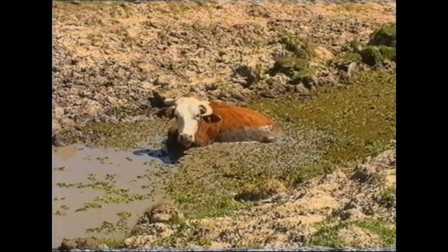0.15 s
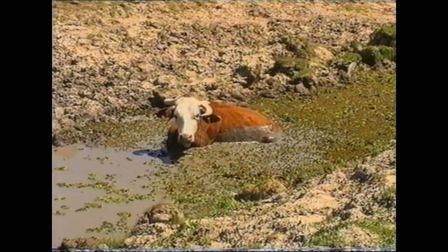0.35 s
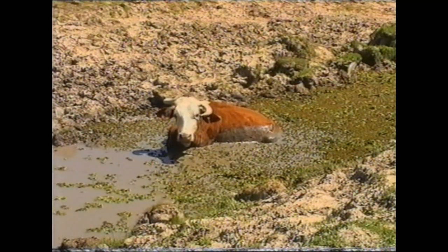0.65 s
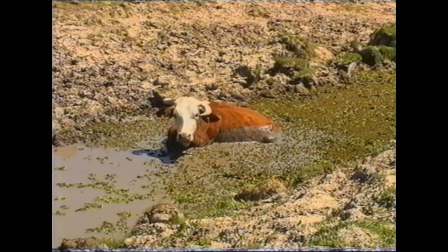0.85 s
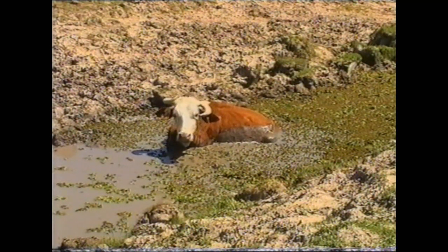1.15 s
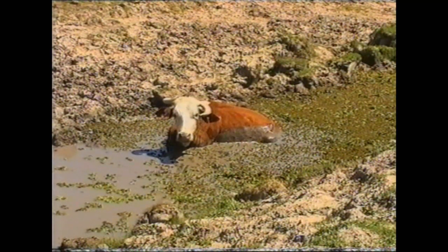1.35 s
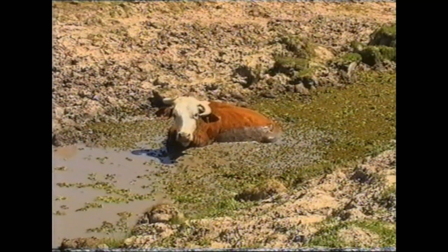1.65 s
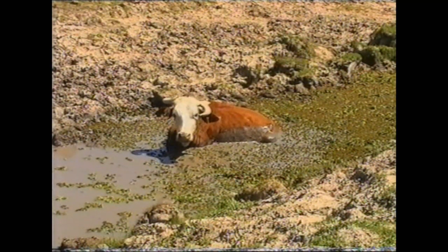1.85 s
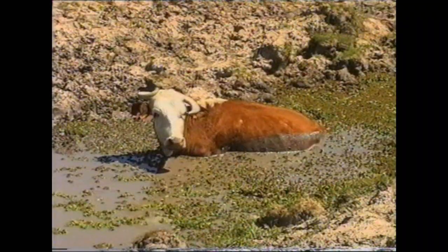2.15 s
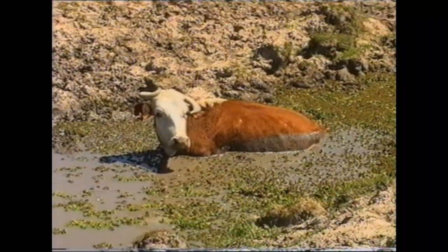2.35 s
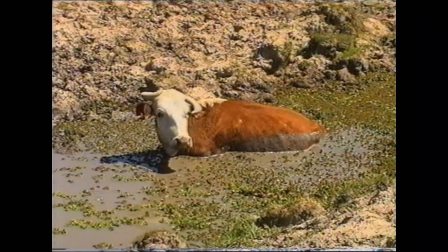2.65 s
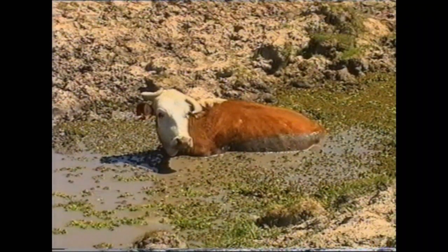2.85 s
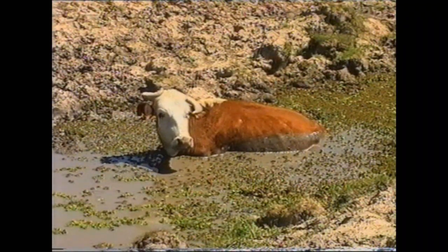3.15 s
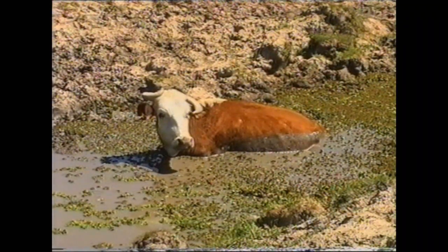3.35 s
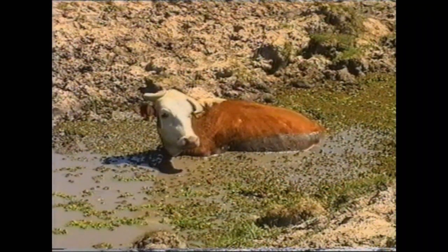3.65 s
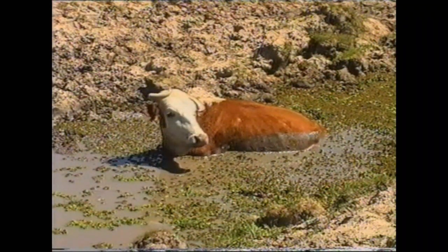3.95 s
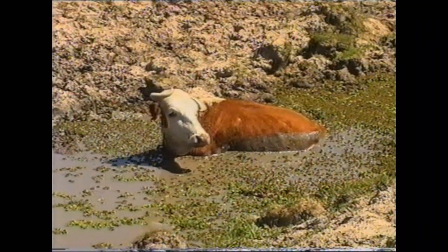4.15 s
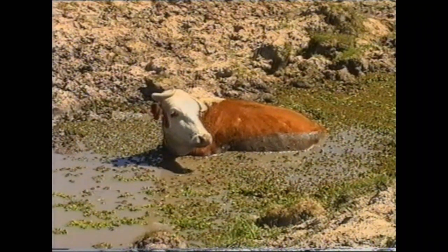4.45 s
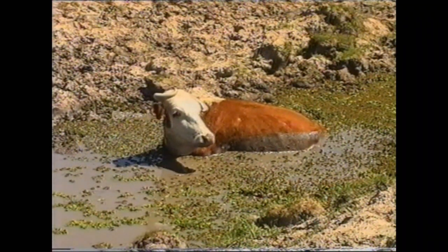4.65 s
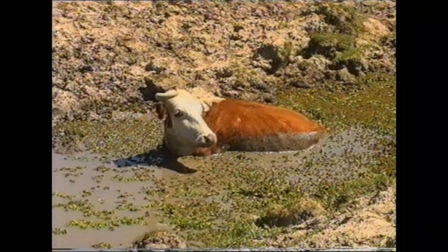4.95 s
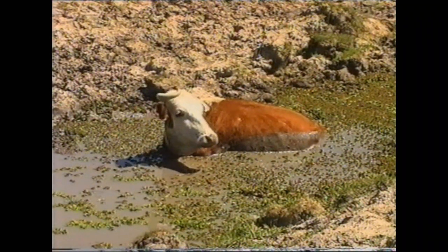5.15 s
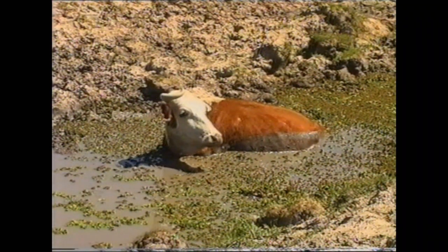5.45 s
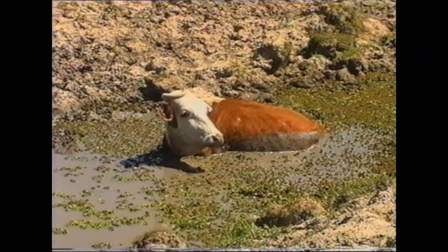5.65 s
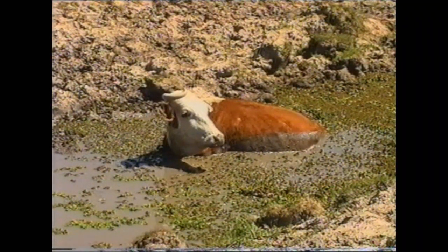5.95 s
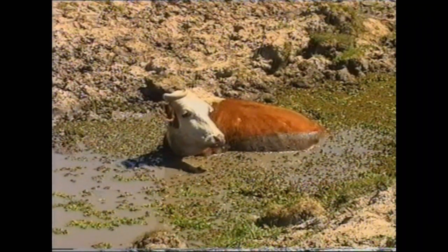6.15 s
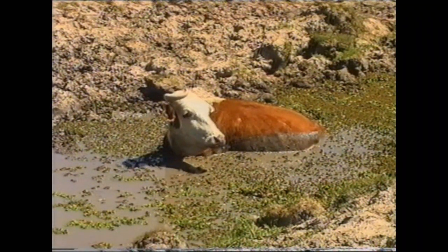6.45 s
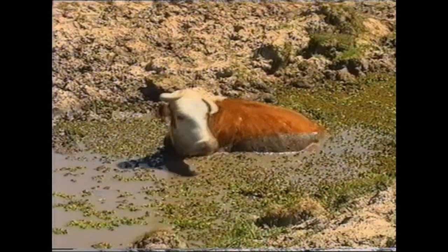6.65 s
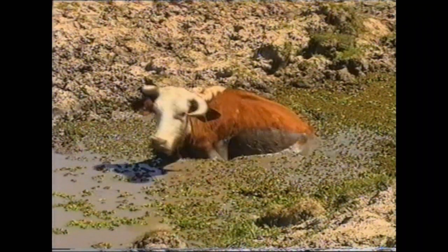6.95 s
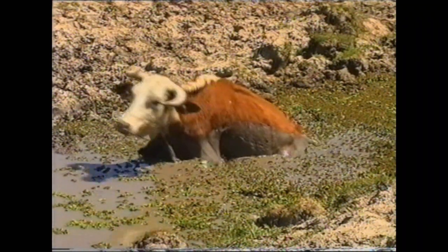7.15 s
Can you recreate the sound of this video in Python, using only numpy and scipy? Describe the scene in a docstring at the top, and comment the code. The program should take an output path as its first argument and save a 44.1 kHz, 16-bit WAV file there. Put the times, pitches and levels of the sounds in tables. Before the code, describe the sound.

For the first second, a few nearby birds pipe short, falling notes in a marsh, with thin warbles, downward whistles and a far flock behind them and a brief puff of wind on the microphone. At 1 second the sound cuts abruptly to a distant, dense chorus of small animals. Their high rasps and peeps merge into a rushing hiss that swells and lulls, grows slightly brighter, and lasts until the end at about 7.3 seconds. A sharp, close knock, like a small hollow shell being struck, sounds slightly to the right at 1.5 seconds. Much lighter knocks follow until 2.5 seconds, then near 4.2, 5.8 and 6.3, with a firmer one at 7.2. Low wind buffets hit the microphone around 3 seconds, most strongly between 4.7 and 5.4, and faintly near 7, over a soft stir of air.

```python
"""A marsh in a breeze, in two scenes. For the first second a few birds pipe falling notes close by,
harmonics shaped by the throat, while others whistle and warble behind them over a far flock.
Then a hard cut: a far, dense chorus of small callers, whose rasps and peeps merge into a rushing hiss.
A few close knocks ring a small hollow shell over it, the first one the hardest.
Wind buffets the two microphone ports in both scenes, most strongly just after five seconds."""
import sys
import numpy as np
from scipy import signal
from scipy.fft import rfft, irfft
from scipy.io import wavfile
from scipy.ndimage import uniform_filter1d

SR = 44100
rng = np.random.default_rng(int(sys.argv[2]) if len(sys.argv) > 2 else 0)


def master_out(mix):
    """Clip the mix to full scale and print it as 16-bit PCM to the path in sys.argv[1]."""
    frames = np.transpose(np.atleast_2d(mix))
    ceiling = np.clip(frames, -1, 1)
    pcm = np.round(ceiling * 32767).astype(np.int16)
    wavfile.write(sys.argv[1], SR, pcm)


N = 322371
T = np.arange(N) / SR
FADE_S, CUT_S = 1.001, 1.0056  # the birds have faded; the chorus cuts in

# Level ride of the higher callers: time_s, level_db
HIGH_RIDE = [(1.01, -27), (1.2, -27.5), (1.26, -30), (1.4, -26), (1.52, -29), (1.62, -26), (1.7, -28.5),
             (1.8, -26), (2.03, -30), (2.12, -27.5), (2.29, -26.5), (2.38, -30), (2.56, -27.5),
             (2.83, -29.5), (2.92, -24), (3.06, -31.5), (3.21, -25), (3.38, -29.5), (3.46, -25.5),
             (3.75, -26), (4.06, -23.5), (4.45, -28), (4.55, -22.5), (4.7, -26.5), (4.76, -22.5),
             (4.98, -26), (5.06, -24.5), (5.39, -25), (5.46, -21.5), (5.54, -27.5), (5.66, -29),
             (5.77, -23.5), (5.92, -28), (6.06, -24), (6.17, -28), (6.26, -23), (6.9, -28.5), (6.98, -25),
             (7.31, -27.5)]
# Slow rides of the other bands: time_s, lower_db, deepest_db, treble_db
BAND_RIDES = [(1.01, -34.5, -52, -48.5), (1.4, -30.5, -48.5, -48), (1.8, -30, -45, -47.5),
              (2.4, -31.5, -45.5, -47), (2.9, -31.5, -44, -46.5), (3.5, -31.5, -44, -44.5),
              (4.1, -31.5, -42.5, -42.5), (4.7, -33, -42.5, -42), (5.3, -32.5, -42.5, -41.5),
              (5.7, -34.5, -44.5, -42), (6.1, -34, -44, -43), (6.4, -31.5, -43, -43.5),
              (7.0, -32, -43.5, -42.5), (7.31, -33.5, -45.5, -45)]
# Nearer high callers: pitch_hz, spread_hz, offset_db, peeps_per_s
NEAR_PEEPERS = [(4330, 220, -3., 150), (5250, 350, -12., 40), (5600, 350, -16., 9)]
def chorus():
    """Countless small callers swell and lull in a wash of rasps, with peeps that stand out."""
    high_db = np.interp(T, *np.transpose(HIGH_RIDE))
    quick_db = high_db - uniform_filter1d(high_db, SR // 2)
    times, *rides = np.transpose(BAND_RIDES)
    low_db, deep_db, treble_db = (np.interp(T, times, ride) for ride in rides)
    low_db += .37 * quick_db  # the lower callers partly share the quick lulls
    out = rasp_wash(deep_db + 14.5 + .42 * quick_db, low_db + 6, high_db, treble_db + 19 + quick_db)
    out += amp(low_db - 3.5 + 2 * drift(N, 4000)) * peeps(2722, spread_hz=120, per_s=130, width_hz=240)
    for hz, spread_hz, db, per_s in NEAR_PEEPERS:
        out += amp(high_db + db + 2 * drift(N, 3000)) * peeps(hz, spread_hz, per_s, width_hz=300)
    return out * amp([[-.75], [.75]]) * (T >= CUT_S)


# Tone of the wash: freq_hz, gain_db
WASH_EQ = [(410, -78), (700, -40), (968, -27), (1430, -10.5), (2190, -8.5), (2560, -5), (3190, -7.5),
           (4350, -2), (6100, -14.5), (6850, -13), (7600, -21), (10900, -28), (12400, -36.5), (14300, -58),
           (15500, -79)]
# Its stereo width, side against mid: freq_hz, side_db
WASH_WIDTH = [(60, 5), (110, 4), (200, 2), (380, 31), (700, 9), (1290, -14.5), (2380, -16.5), (4400, -15.5),
              (8120, -8), (15000, -12.5)]
def rasp_wash(deep_db, low_db, high_db, treble_db):
    """Overlapping rasps merge into a hiss: four crossfaded bands, mottled by drifting patches."""
    hz, t, low_rasps = rasps(per_s=300, depth=.25)
    high_rasps = rasps(per_s=490, depth=.56)[2]
    hz = hz[:, None] + 1
    high_share = np.clip(np.log2(hz / 2900) / .53, 0, 1)
    deep_share = np.clip(np.log2(2100 / hz) / .3, 0, 1)
    treble_share = np.clip(np.log2(hz / 5800) / .5, 0, 1)
    under_db = (1 - deep_share) * np.interp(t, T, low_db) + deep_share * np.interp(t, T, deep_db)
    over_db = (1 - treble_share) * np.interp(t, T, high_db) + treble_share * np.interp(t, T, treble_db)
    spectra = np.sqrt(1 - high_share) * low_rasps * amp(under_db)
    spectra += np.sqrt(high_share) * high_rasps * amp(over_db)
    patches = uniform_filter1d(rng.standard_normal(spectra.shape[1:]), 3, axis=0)
    spectra *= amp(1.5 * evened(uniform_filter1d(patches, 10, axis=1)))
    mid, side = coloured(signal.istft(spectra, SR, nperseg=256)[1][:, :N], WASH_EQ)
    return amp(12) * stereo(mid, coloured(side, WASH_WIDTH))


def rasps(per_s, depth):
    """Short-time spectra of two noises that jump up at each call and fall back within milliseconds."""
    call_power = clicks(per_s, spread_db=3) ** 2
    power = signal.lfilter([1], [1, -np.exp(-1 / (.0073 * SR))], call_power)
    noise = rng.standard_normal((2, N)) * np.sqrt(1 + depth * power / power.mean())
    return signal.stft(noise, SR, nperseg=256)


def peeps(hz, spread_hz, per_s, width_hz):
    """Three callers, each a resonance of wandering pitch rung by its own random clicks."""
    out, pole = np.zeros(N), np.exp(-np.pi * width_hz / SR)
    for _ in range(3):
        pulses = clicks(per_s, spread_db=.59)
        pitch_hz = hz + spread_hz * drift(N, 485)
        carrier = np.exp(2j * np.pi * np.cumsum(pitch_hz) / SR)
        # Shift the pitch down to zero, smooth twice, shift back.
        out += (carrier * signal.lfilter([1], [1, -2 * pole, pole ** 2], pulses / carrier)).real
    return evened(out)


# Piped notes, the loud ones from the nearest bird:
# start_s, length_s, top_hz, end_hz, level_db, tilt_db_per_harmonic
PIPED_NOTES = [(0, 0.086, 1164, 986, -30, 1), (0.143, 0.046, 975, 914, -32, 1),
               (0.168, 0.08, 1180, 980, -28.5, 1), (0.255, 0.069, 1274, 1170, -48.5, 5.5),
               (.33, .106, 1159, 950, -29.5, .5), (.42, 0.075, 1170, 1074, -41.5, -0.5),
               (0.496, 0.099, 1150, 984, -30, 0), (0.564, 0.066, 1147, 1100, -38, -1),
               (.625, 0.035, 980, 910, -41, 0), (.625, 0.044, 1140, 1110, -45, -2),
               (.66, 0.092, 1153, 1012, -30.5, -1), (0.742, 0.081, 1046, 895, -36, -0.5),
               (0.839, 0.081, 1113, 1002, -32, -1), (0.839, 0.064, 1200, 1160, -50, 11),
               (0.918, 0.037, 968, 930, -40.5, -4.5), (0.953, 0.068, 890, 830, -44, -2)]
def birds():
    """The opening scene: near birds and their reflections, and far birds that swell with the piping."""
    calls = np.zeros(N)
    for start_s, *note in PIPED_NOTES:
        add(calls, start_s, piped_note(*note, flutter_db=4.2, jitter=.004))
    piping_db = 10 * np.log10(uniform_filter1d(calls ** 2, 1300).clip(1e-5))
    swell = amp(-43 + .35 * (piping_db + 32))
    calls += chips() + warbles() + whistles()
    flock = swell * far_flock()
    calls += swell * far_notes(count=24)
    fade = np.clip((FADE_S - T) / .006, .12, 1) * (T < CUT_S)
    return (calls + amp(-9) * reflections(calls, t60_s=.06) + flock) * fade


# Throat resonances of the piping birds: freq_hz, gain_db
THROAT_EQ = [(900, -16), (1150, -13), (2270, -2), (3350, 0), (4450, -6), (5670, -15), (6900, -24),
             (8000, -38), (10300, -37), (11500, -55)]
def piped_note(length_s, top_hz, end_hz, db, tilt_db, flutter_db, jitter):
    """A harmonic note through the throat; each harmonic flutters as reflections beat with it."""
    t = np.arange(0, length_s, 1 / SR)
    progress = t / length_s
    scoop = 1 - .0348 * np.exp(-t / .0099)
    hz = top_hz * scoop + (end_hz - top_hz) * progress ** 1.5  # scoops up, then sags ever faster
    level_db = db - 4 * np.exp(-t / .012) - 8 * progress ** 3  # swells, holds, dies away
    bright_db = tilt_db - 2.5 * (progress - .5)  # dulls as it goes
    cycles = np.cumsum(hz * (1 + jitter * drift(len(t), 260))) / SR
    note = np.zeros(len(t))
    for k in range(1, 10):
        gain_db = curve_at(THROAT_EQ, k * hz) + bright_db * (min(k, 5) - 3)
        gain_db += flutter_db * drift(len(t), 110)
        note += amp(gain_db) * np.sin(2 * np.pi * (k * cycles + rng.random()))
    rms = np.sqrt(uniform_filter1d(note ** 2, 900) + 1e-12)
    return amp(level_db) * note / rms * signal.windows.tukey(len(t), .15)


# Rough note attacks: start_s, level_db
CHIP_HITS = [(0.319, -28), (0.4865, -29), (0.654, -29), (0.8297, -32)]
def chips():
    """A burst of noise through the throat opens some of the notes."""
    out, t = np.zeros(N), np.arange(600) / SR
    for start_s, db in CHIP_HITS:
        envelope = amp(db - 60 * t / .053) * np.minimum(t / .0037, 1) ** 2
        add(out, start_s, envelope * evened(coloured(rng.standard_normal(len(t)), THROAT_EQ)))
    return out


# One list a warble, one row a swing: crest_s, crest_hz, dip_before_hz, level_db
WARBLE_PHRASES = [
    [(.119, 4050, 2890, -36), (.135, 4580, 3100, -34.5), (.153, 4950, 2720, -38), (.177, 5170, 3970, -39),
     (.192, 5450, 4150, -40), (.207, 5050, 4250, -46)],
    [(.238, 7600, 6850, -57), (.252, 7400, 6800, -51)],
]
def warbles():
    """Small birds swing a whistle smoothly from dip to crest and back."""
    out = np.zeros(N)
    for phrase in WARBLE_PHRASES:
        crest_s, crest_hz, dip_hz, db = np.transpose(phrase)
        t = np.arange(crest_s[0] - .023, crest_s[-1] + .0051, 1 / SR)  # opens on the first dip
        swing_s = [crest_s[0] - .009, *crest_s, crest_s[-1] + .015]
        swing = np.interp(t, swing_s, [-.5, *range(len(phrase) + 1)])
        lift = .5 + .5 * np.cos(2 * np.pi * swing)
        floor_hz = np.interp(swing + .5, range(len(phrase)), dip_hz)
        hz = floor_hz + (np.interp(t, crest_s, crest_hz) - floor_hz) * lift
        level_db = np.interp(t, crest_s, db) + .5 * (1 - lift)
        add(out, t[0], whistle_tone(hz, level_db, partials_db=-11))
    return out


# Falling whistles: start_s, length_s, first_hz, last_hz, level_db
WHISTLE_GLIDES = [(.718, .047, 5900, 4500, -46), (.785, .05, 6300, 3650, -52)]
def whistles():
    """Thin, almost pure whistles glide down behind the piping."""
    out = np.zeros(N)
    for start_s, length_s, first_hz, last_hz, db in WHISTLE_GLIDES:
        hz = np.geomspace(first_hz, last_hz, round(length_s * SR))
        add(out, start_s, whistle_tone(hz, db, partials_db=-32))
    return out


def whistle_tone(hz, db, partials_db):
    """A fluttering sine with partials at half and one and a half times its pitch."""
    phase = 2 * np.pi * np.cumsum(hz) / SR
    tone = np.sqrt(2) * np.sin(phase) + amp(partials_db) * (np.sin(.5 * phase) + np.sin(1.5 * phase))
    return amp(db + 2 * drift(len(hz), 90)) * tone * signal.windows.tukey(len(hz), .2)


# Close knocks: start_s, level_db, pitch_hz, left_over_right_db, crack_db
KNOCK_HITS = [(1.459, -18.5, 850, -8, -6.5), (1.667, -41.5, 880, -4.5, -6), (1.83, -38.5, 597, -4.0, 3),
              (2.025, -38, 734, -8, -15), (2.472, -35, 720, -8, -6), (4.206, -37.5, 890, -7, -10),
              (5.79, -40, 935, -10, -8.0), (6.348, -42.5, 520, -9, 6), (6.844, -48, 800, -9, 14),
              (7.246, -28, 825, -11, -17)]
# Modes of the shell: pitch_ratio, gain_db, t60_s
SHELL_MODES = [(1, 1.5, 0.035), (2.15, 4, 0.017), (.35, -23.5, 0.12), (.55, -16, 0.11), (1.2, -9, 0.05)]
# Tone of the bright crack: freq_hz, gain_db
CRACK_EQ = [(300, -30), (1000, -16), (1850, 6), (3000, -12), (5900, -3), (8500, -8), (11000, -9),
            (15500, -30)]
def knocks():
    """A small hollow shell rings with no bass; harder knocks bring out its top mode and the crack."""
    out, t = np.zeros((2, N)), np.arange(3000) / SR
    attack = np.minimum(t / .00034, 1)
    crack_decay = amp(-60 * t / .018) + amp(-14 - 60 * t / .06)
    for start_s, db, hz, pan_db, crack_db in KNOCK_HITS:
        ring = np.zeros(len(t))
        for ratio, mode_db, t60_s in SHELL_MODES:
            hardness_db = .5 * (db + 31) * (ratio > 2)
            ring += amp(mode_db + hardness_db - 60 * t / t60_s) * np.sin(2 * np.pi * ratio * hz * t)
        crack = evened(coloured(rng.standard_normal(len(t)), CRACK_EQ))
        crack *= amp(crack_db + .5 * (db + 43.5)) * crack_decay
        pan = amp([[pan_db / 2], [-pan_db / 2]])
        add(out, start_s, amp(db) * (ring + crack) * attack * pan)
    return signal.lfilter(*signal.butter(2, 200, "high", fs=SR), out)


# Wind thumps: centre_s, level_db
BUFFET_HITS = [(0.312, -37), (0.356, -28), (0.4, -34), (0.442, -30), (0.516, -39), (2.98, -35),
               (3.02, -34.5), (3.118, -26), (3.255, -41), (3.293, -36.5), (3.39, -41), (3.907, -42),
               (3.959, -44), (4.721, -32.5), (4.759, -28), (4.895, -32.5), (4.934, -28), (4.983, -24.5),
               (5.029, -20), (5.058, -30), (5.122, -26.5), (5.157, -20), (5.2, -21), (5.234, -18.5),
               (5.272, -15), (5.319, -17), (5.366, -25.5), (5.502, -36), (5.591, -40.5), (6.342, -37.5),
               (6.385, -45), (6.794, -37), (6.897, -42), (6.955, -33.5), (7.005, -37)]
# Tone of a medium buffet: freq_hz, gain_db
BUFFET_EQ = [(15, -54), (25, -46), (97, 1), (172, 4.5), (216, -3), (275, -6), (392, -15), (433, -22.5),
             (1200, -42), (1560, -76), (2640, -120)]
def wind(width_s=.022, eddy_lag_s=.12):
    """Lumps of low turbulence, mostly opposed at the two ports; a faint eddy trails each buffet."""
    out = np.zeros((2, N))
    t = np.arange(-3 * width_s, 3 * width_s, 1 / SR)
    hump = np.exp(-1.8 * (t / width_s) ** 2)
    eddies = [(s - eddy_lag_s * np.log(rng.random()), rng.uniform(-48.5, -40.5)) for s, _ in BUFFET_HITS]
    for centre_s, db in BUFFET_HITS + eddies:
        eq = [(hz * amp(.18 * (db + 23)), gain) for hz, gain in BUFFET_EQ]  # stronger reaches higher
        rumble = coloured(rng.standard_normal((2, SR // 4)), eq)[:, :len(t)]
        mid, side = (evened(x * hump) * hump.std() for x in rumble)
        add(out, centre_s - 3 * width_s, amp(db) * stereo(amp(-9) * mid - .16 * side, side))
    return out


def far_notes(count):
    """Farther birds pipe falling notes at random moments and pitches."""
    out = np.zeros(N)
    for start_s, pitch, length, size in rng.random((count, 4)):
        hz, length_s, db = 800 + 500 * pitch, .068 + .029 * length, -6.5 + 13.7 * size
        add(out, start_s, piped_note(length_s, hz, .85 * hz, db, tilt_db=0, flutter_db=2, jitter=.0046))
    return out


# Tone of the far flock: freq_hz, gain_db
FLOCK_EQ = [(410, -65), (700, -23), (1090, -28), (1370, -8.5), (2220, -4.5), (2560, -4), (3190, -9),
            (4300, -10), (4890, -14.5), (15500, -35.5)]
def far_flock():
    """Far birds blur together into a wide, flickering murmur."""
    mid, side = coloured(rng.standard_normal((2, N)), FLOCK_EQ)
    return evened(stereo(mid, .6 * side)) * amp(1.9 * drift(N, 300))


def reflections(x, t60_s):
    """Sparse echoes off water and reeds, different at each port."""
    t = np.arange(SR // 5) / SR
    taps = rng.standard_normal((2, len(t))) * (rng.random((2, len(t))) < .05)
    taps *= amp(-60 * t / t60_s) * (t > .003)
    return signal.fftconvolve(x[None], taps / np.linalg.norm(taps[0]), axes=1)[:, :N]


# Tone of the air bed: freq_hz, gain_db
AIR_EQ = [(15, -51), (25, -15.5), (162, -1), (219, -3.5), (642, -6.5), (764, -8), (1100, -6), (1430, -9),
          (2420, -120)]
def air():
    """A low, constant stir of air, unrelated at the two ports."""
    return amp(-56.5 + 2.3 * drift(N, 1600)) * evened(coloured(rng.standard_normal((2, N)), AIR_EQ))


def amp(db):
    return 10 ** (np.asarray(db) / 20)


def evened(x):
    """Scales x to rms 1."""
    return x / np.sqrt(np.mean(x ** 2) + 1e-20)


def curve_at(eq, hz):
    """Gain of an EQ curve in dB, interpolated over log frequency."""
    freq_hz, gain_db = np.transpose(eq)
    return np.interp(np.log(hz + 1), np.log(freq_hz + 1), gain_db)


def coloured(x, eq):
    """Filters x through an EQ curve."""
    hz = np.fft.rfftfreq(x.shape[-1], 1 / SR)
    return irfft(rfft(x) * amp(curve_at(eq, hz)), x.shape[-1])


def drift(length, span):
    """Smooth random motion of rms 1 that changes over about span samples."""
    return evened(uniform_filter1d(uniform_filter1d(rng.standard_normal(length), span), span))


def clicks(per_s, spread_db):
    """Impulses of random timing and strength."""
    return amp(spread_db * np.minimum(rng.exponential(1, N), 4)) * (rng.random(N) < per_s / SR)


def add(mix, start_s, sound):
    part = mix[..., max(round(start_s * SR), 0):][..., :sound.shape[-1]]
    part += sound[..., :part.shape[-1]]


def stereo(mid, side):
    return np.array([mid + side, mid - side])


def scene():
    return birds() + chorus() + knocks() + wind() + air()


def record(dry):
    """A steep low-pass at 15.7 kHz trims the top of the mix."""
    return signal.oaconvolve(dry, signal.firwin(511, 15700, window=("kaiser", 9), fs=SR)[None], "same")


dry = scene()
out = record(dry)
master_out(out)
```